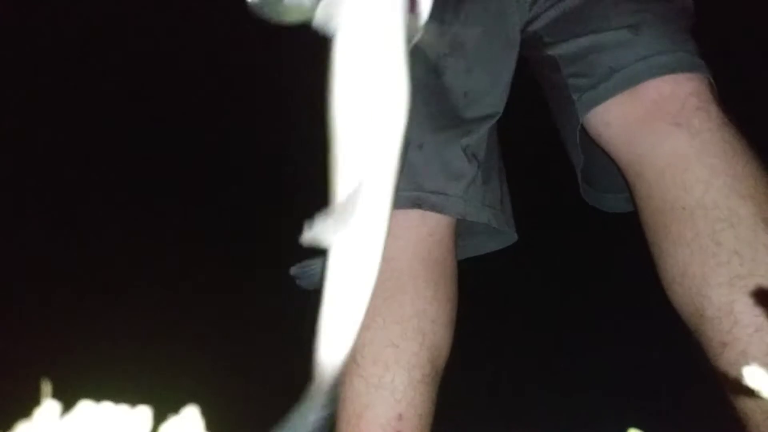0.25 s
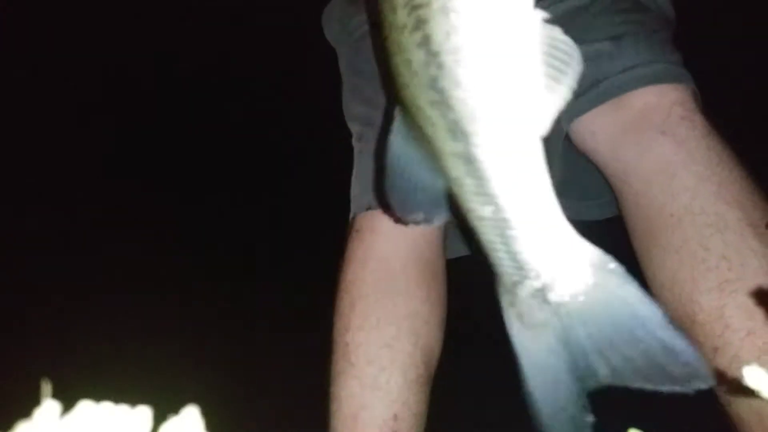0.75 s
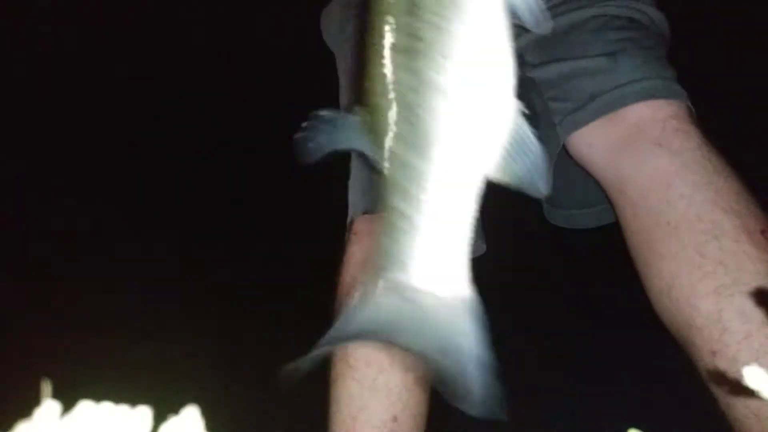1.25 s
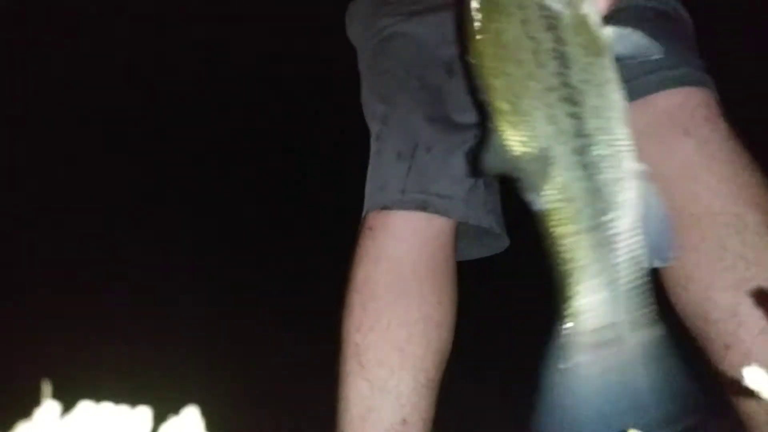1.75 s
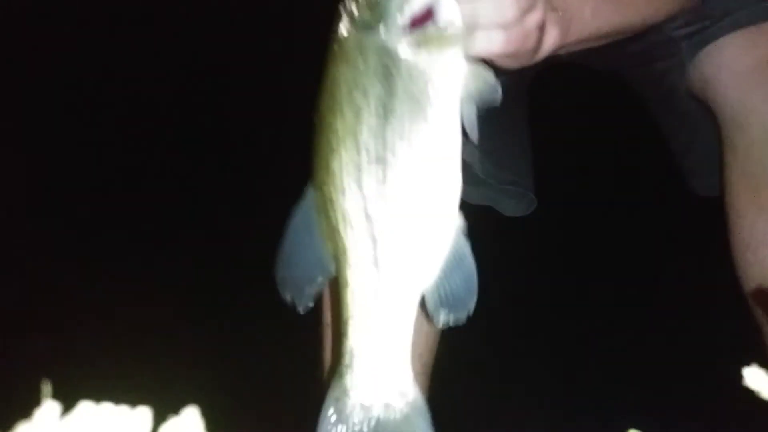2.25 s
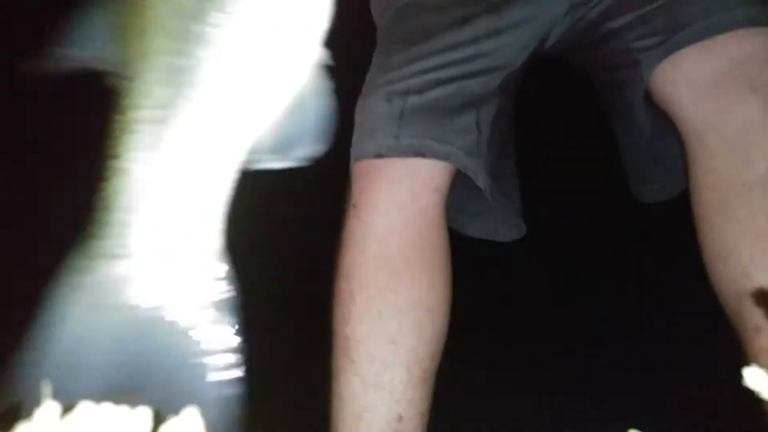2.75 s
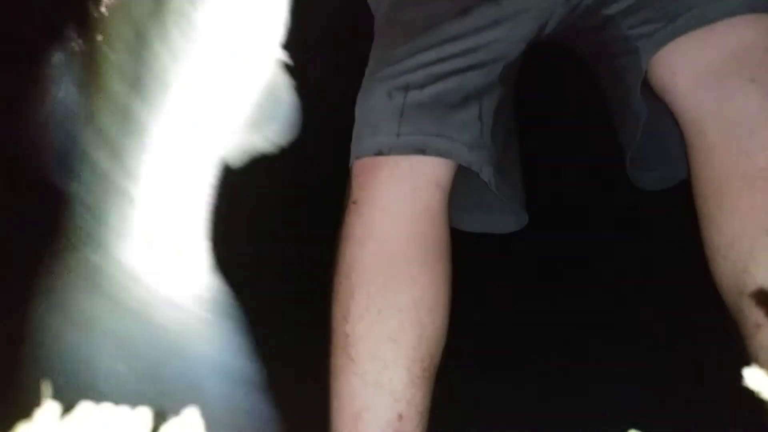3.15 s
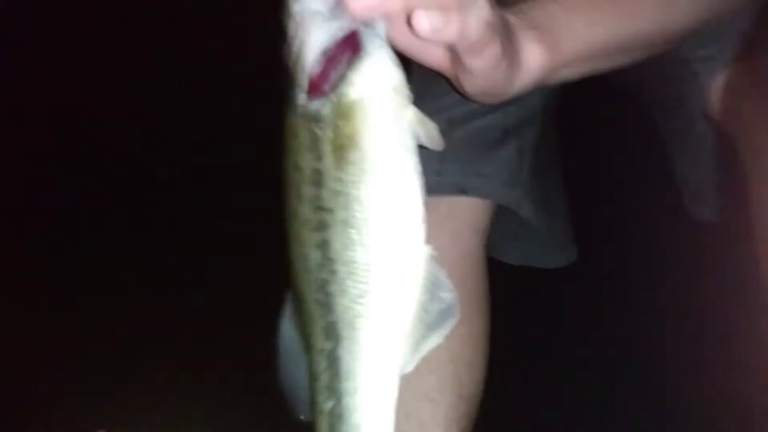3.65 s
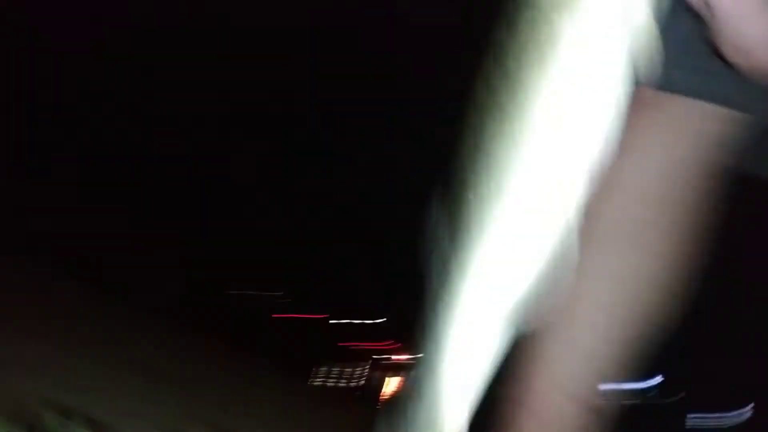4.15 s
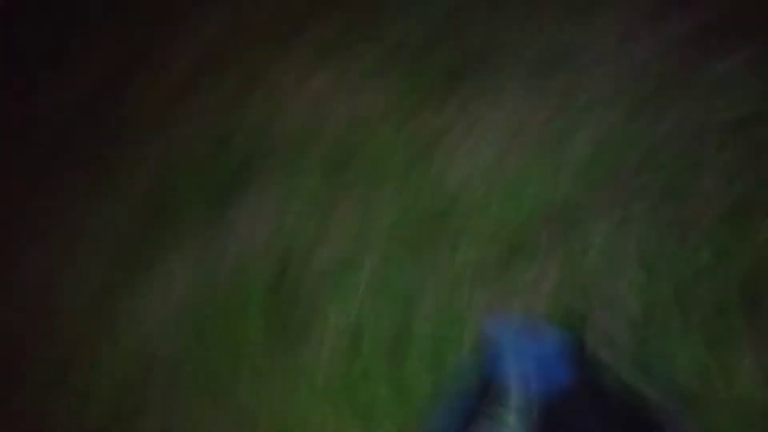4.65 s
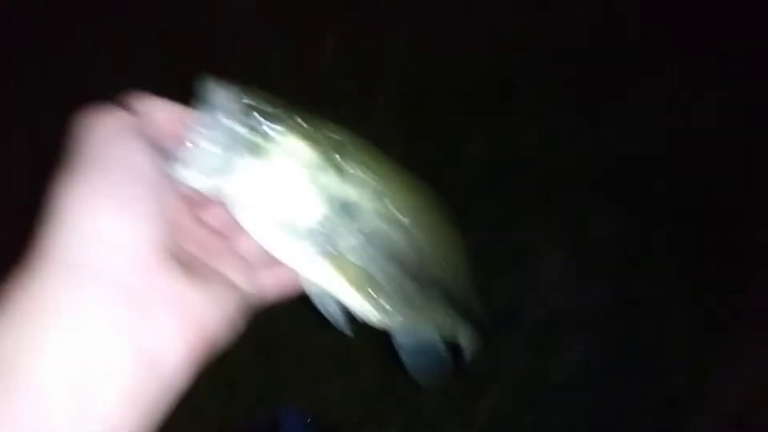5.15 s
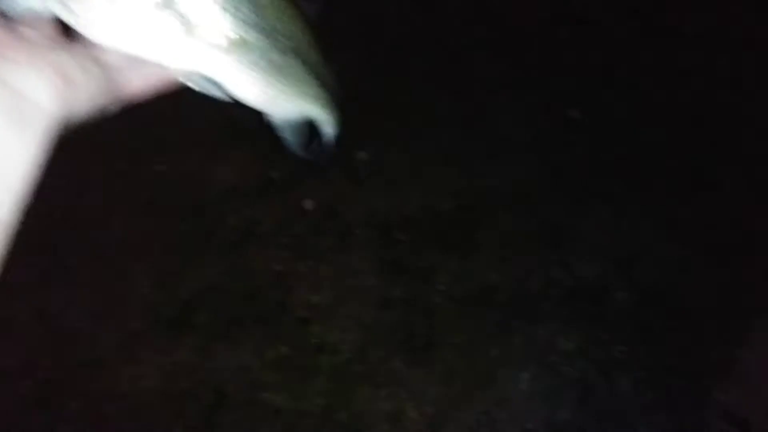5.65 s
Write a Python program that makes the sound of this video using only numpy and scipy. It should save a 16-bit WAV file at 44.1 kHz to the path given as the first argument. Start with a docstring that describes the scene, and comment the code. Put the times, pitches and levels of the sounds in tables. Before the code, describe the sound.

Outdoors on a summer night, two katydids alternate harsh two-stroke rasps above a steady fluttering cricket chorus and faint distant hum. Close to the microphone, a held fish gives a sharp wet slap and a cluster of taps just after two seconds, followed by scuffing hands and cloth and another knock around four. Then the microphone swings toward the insects, making them louder and brighter, with thin high lisps and a distant low trill.

```python
"""Katydids and a fish on a summer night bank

Two katydids trade two-syllable rasps, scraper over file, above a chorus of crickets made of fluttering narrow bands.
Close by someone holds up a fish: it thrashes with wet slaps, short ringing bursts, and hands and clothes rustle in
grains. Late on the microphone swings round to face the chorus, thin high lisps and a distant trill.
Far traffic and machinery lie underneath as coloured noise and a wavering hum."""
import sys
import numpy as np
from scipy import signal
from scipy.fft import rfft, irfft
from scipy.io import wavfile
from scipy.ndimage import uniform_filter1d

SR = 44100
rng = np.random.default_rng(int(sys.argv[2]) if len(sys.argv) > 2 else 0)


def materialize(psi):
    """Save the field psi as 16-bit PCM at rate SR to the path in sys.argv[1].

    A 1-D psi becomes a single channel; in a 2-D psi each row is a channel.
    """
    bounded = np.clip(np.atleast_2d(psi).T, -1, 1)
    quanta = np.round(bounded * 32767).astype(np.int16)
    wavfile.write(sys.argv[1], SR, quanta)


N = 259749
TIME = np.arange(N) / SR  # s
HZ = np.fft.rfftfreq(N, 1 / SR)

# The ring shared by slaps, taps and sticky snaps. Each row: frequency in Hz, relative level in dB.
KNOCK_SPECTRUM = [(100, -46), (500, -31.5), (930, -8.5), (1200, -15), (1600, -6.5), (2050, -8.5),
                  (2400, -7.5), (2650, -7.5), (2950, 0), (3550, -13.5), (4400, -3.5), (5300, -11),
                  (7100, -10.5), (8600, -16.5), (9900, -17.5), (10500, -20.5), (11200, -15), (12200, -31),
                  (13000, -15.5), (14200, -27), (16500, -41)]


def amp(db):
    """Decibels to gain."""
    return 10 ** (np.asarray(db) / 20)


def unit(x):
    """Scales to rms 1."""
    return x / np.sqrt(np.mean(x ** 2) + 1e-20)


def read(points, hz):
    """Reads a spectrum's value, joined on a log-frequency axis."""
    f, value = np.transpose(points)
    return np.interp(np.log(hz + 1), np.log(f + 1), value)


def add(mix, s, sound):
    """Mixes a sound in, starting at time s; whatever falls outside the mix is cut."""
    start = round(s * SR)
    sound = sound[max(-start, 0):]
    part = mix[max(start, 0):][:len(sound)]
    part += sound[:len(part)]


def shaped(x, db):
    """Colours a whole-length signal by a gain in dB at each of HZ."""
    return irfft(rfft(x) * amp(db), N)


def ring(points, tilt_db=0, peak_hz=4000, peak_db=0, octaves=0.27, size=2048):
    """Impulse response of a body with this spectrum, tilted per octave about peak_hz, that resonance brought out."""
    hz = np.fft.rfftfreq(size, 1 / SR)
    apart = np.log2(np.maximum(hz, 300) / peak_hz)  # octaves from the resonance
    db = read(points, hz) + tilt_db * apart + peak_db * np.exp(-(apart / octaves) ** 2)
    log_gain = np.log(amp(np.concatenate([db, db[-2:0:-1]])))
    # minimum phase: the body sounds only after it is struck
    spectrum = np.exp(np.conj(signal.hilbert(log_gain)))
    response = np.fft.ifft(spectrum).real[:size // 2]
    return response / np.linalg.norm(response)


def drift(rate_hz):
    """Slow random wander of rms 1: noise through a soft low-pass."""
    lowpass = np.exp(-(HZ / rate_hz) ** 2) * (HZ > 0)
    return unit(irfft(rfft(rng.standard_normal(N)) * lowpass, N))


def voices(hz, width_hz):
    """Many far singers near one pitch merge into a fluttering narrow band of rms 1."""
    phase = 2 * np.pi * np.cumsum(hz * np.ones(N)) / SR
    return unit(drift(width_hz * 0.71) * np.cos(phase) + drift(width_hz * 0.41) * np.sin(phase))


def swell(s, rise_s, fall_s, shape=2):
    """A rise to 1 at time s and a fall back; shape 1 is pointed, 2 is rounded."""
    return np.exp(-(abs(TIME - s) / np.where(TIME < s, rise_s, fall_s)) ** shape)


def trees(x, wet_db, t60):
    """Ground and foliage scatter sound into sparse random echoes that fade 60 dB in t60 seconds."""
    t = np.arange(SR // 2) / SR
    sparse = rng.standard_normal(len(t)) * (rng.random(len(t)) < .1)
    tail = sparse * (t > .003) * amp(-60 * t / t60)  # first echo after 3 ms
    wet = signal.fftconvolve(x, tail / np.linalg.norm(tail))[:N]
    return (x + amp(wet_db) * wet) / np.sqrt(1 + amp(wet_db) ** 2)


def air(facing, swell_db=1.0, waver_hz=8):
    """Night air and far traffic as a wash whose colour turns with the microphone, plus a wavering machinery hum."""
    # Colour of the wash. Each row: frequency in Hz, relative level in dB.
    wash_spectrum = [(30, -42), (65, -32), (110, -20), (170, -8), (250, 2), (340, 1), (950, -1),
                     (1600, -11), (2400, -15), (3700, -16), (5800, -13), (6900, -21.5), (10000, -29),
                     (15500, -28)]
    # Change of colour with the microphone swung round. Each row: frequency in Hz, gain in dB.
    turned_colour = [(250, 0), (450, -6.5), (750, -2.5), (1100, 5.5), (1600, 13), (2400, 8.5), (4000, 7),
                     (6000, -3), (12000, -3.5)]
    # Distant machinery. Each row: frequency in Hz, level in dB before the 1 dB lift below.
    hum_tones = [(188.4, -67.5), (226.1, -68), (247.6, -65)]
    ahead = unit(shaped(rng.standard_normal(N), read(wash_spectrum, HZ)))
    turned = shaped(ahead, read(turned_colour, HZ))
    level = amp(-48.13 + swell_db * drift(5.0))
    wash = level * ((1 - facing) * ahead + facing * turned)
    hum = sum(amp(db + 1) * voices(hz, waver_hz) for hz, db in hum_tones)
    return wash + hum


def crickets(facing, swell_db=-0.3):
    """A steady chorus of merged singers in several bands, each changed in level where the microphone faces it."""
    # Each row: centre in Hz, width in Hz, level in dB, gain in dB when the microphone faces the chorus fully.
    bands = [(3120, 335, -56, 10), (2960, 660, -60, 13), (4580, 700, -65.5, 14), (6000, 330, -64.5, 5),
             (8200, 380, -75, -12)]
    chorus = np.zeros(N)
    for hz, width_hz, db, gain_db in bands:
        level = amp(db + gain_db * facing + swell_db * drift(15))
        chorus += level * voices(hz, width_hz)
    return chorus


def paired(calls, accent_db, gap_s=.127):
    """Makes each call two wing strokes, the second gap_s later and accented: rows of time, level, tilt."""
    return [(s + k * gap_s, db + k * accent_db, tilt_db) for s, db, tilt_db in calls for k in range(2)]


def katydid(strokes, wing, teeth_hz, jitter, grit, rise, fall, speed_up=1.35, catch_s=0.0011, count=64):
    """Each stroke drags a scraper over a file, ever faster, harder and then softer; every tooth rings the wing."""
    out = np.zeros(N)
    rate = teeth_hz * speed_up ** np.linspace(-1, 1, count)  # teeth per second
    for s, db, tilt_db in strokes:
        spacing = np.maximum(1 + jitter * rng.standard_normal(count), .2) / rate
        at = np.cumsum(spacing)
        peak_s = at[count // 2]
        from_peak = at - peak_s
        teeth = np.zeros(SR // 2)
        teeth[(at * SR).astype(int)] = np.exp(-(from_peak / np.where(from_peak < 0, rise, fall)) ** 2)
        # each click trails a tiny gritty scrape
        trail = signal.lfilter([1], [1, -np.exp(-1 / (catch_s * SR))], teeth + 1e-18)
        scrapes = trail * rng.standard_normal(len(teeth))
        rasp = signal.fftconvolve(unit(teeth) + grit * unit(scrapes), ring(wing, tilt_db))
        # sets the level at the stroke's peak, whatever the tooth rate
        loudness = amp(db) * np.sqrt(SR / teeth_hz) * np.linalg.norm(teeth)
        add(out, s - peak_s, loudness * rasp / np.linalg.norm(rasp))
    return out


def near_katydid():
    """The nearer singer: fairly even teeth, a wing ringing mostly around 4.6 kHz, a short scatter."""
    # Each row: peak of the first stroke in seconds, level in dB, tilt in dB per octave.
    calls = [(.041, -39.5, -0.5), (.717, -39.5, -2.5), (1.49, -39.5, -2.5), (2.174, -42, -3.5),
             (2.952, -39.5, -2), (3.65, -40, -2), (4.161, -41.5, -1.5), (4.814, -44.5, -4),
             (5.621, -47, -5.5)]
    # How its wings ring. Each row: frequency in Hz, relative level in dB.
    wing = [(200, -57), (2700, -16), (3500, -28), (3900, -8.5), (4330, -3), (4600, 1.5), (4880, -5),
            (5600, -15.5), (6600, -29), (9600, -31), (11600, -27), (11950, -16.5), (12500, -28),
            (15700, -21)]
    strokes = paired(calls, accent_db=-0.2)
    rasps = katydid(strokes, wing, teeth_hz=330.4, jitter=.08, grit=0.53, rise=0.046, fall=0.034)
    return trees(rasps, wet_db=-5, t60=.16)


def far_katydid():
    """The farther singer: looser teeth, a wing with strong low and high rings, a long and loud scatter."""
    # Each row: peak of the first stroke in seconds, level in dB, tilt in dB per octave.
    calls = [(.312, -41.5, 2.5), (1.095, -42, 3), (1.757, -42.5, 3.5), (2.565, -42.5, 2), (3.222, -41.5, 1),
             (3.902, -42, 3.5), (4.545, -40, -10.5), (5.21, -44.5, 0), (5.88, -41.5, 0)]
    # How its wings ring. Each row: frequency in Hz, relative level in dB.
    wing = [(200, -91), (1930, -9), (2110, 5.5), (2290, -13), (2600, -1), (3000, -0.5), (3500, -10),
            (4600, 0), (5050, 2), (5700, -7), (6700, -24.5), (10000, -34), (13000, -27.5), (15500, -21.5)]
    strokes = paired(calls, accent_db=0.6)
    rasps = katydid(strokes, wing, teeth_hz=340.5, jitter=.15, grit=0.58, rise=0.045, fall=0.025)
    return trees(rasps, wet_db=-0.5, t60=0.4)


def rubbing(grains_per_s=3500, spread_db=1.5, clump_db=2, snaps_per_s=70, snap_db=-8):
    """Skin and cloth catch and slip in tiny clumped grains: a dull scuff, crackle and a few sticky snaps on top."""
    # One row a stroke: hardest moment in seconds, fade in seconds, relative scuff level in dB, crackle level in dB.
    rubs = [(.5, 0.011, -55, -41.5), (2.211, 0.016, -39.5, -53), (2.36, 0.068, -45, -37),
            (2.428, 0.011, -46, -37.5), (2.52, 0.05, -54, -48.5), (3.323, 0.016, -42, -38),
            (3.42, 0.046, -41, -38), (3.497, 0.034, -43, -44), (3.631, 0.13, -51.5, -48),
            (3.81, 0.033, -38.5, -33.5), (3.9, 0.12, -47.5, -42), (3.995, 0.051, -41, -47),
            (4.09, 0.044, -42.5, -49), (4.228, 0.013, -41, -45.5), (4.41, 0.044, -67, -53),
            (4.62, 0.23, -70, -50.5), (4.825, 0.036, -45, -51)]
    # Colour of the dull scuff. Each row: frequency in Hz, relative level in dB.
    scuff_spectrum = [(50, -48), (150, -33), (450, 6.5), (750, 7), (1050, 12), (1700, 7.5), (2300, -3),
                      (2700, 7.5), (4500, 0), (9000, -67)]
    # Colour of the crackle. Each row: frequency in Hz, relative level in dB.
    crackle_spectrum = [(60, -56), (600, -26), (1800, 1.5), (2800, -0.5), (5300, 3.5), (8000, -3.5),
                        (10000, -11.5), (12500, -16), (15500, -18)]
    _, _, scuff_db, crackle_db = np.transpose(rubs)
    strokes = np.array([swell(s, fade, fade, shape=1.29) for s, fade, _, _ in rubs])
    # overlapping strokes add in power
    scuff_level = amp(2.5) * np.sqrt(amp(scuff_db) ** 2 @ strokes ** 2)
    crackle_level = np.sqrt(amp(crackle_db) ** 2 @ strokes ** 2)
    clumps = amp(clump_db * drift(96))
    size = amp(spread_db * np.minimum(rng.exponential(1, (2, N)), 4))
    happens = rng.random((2, N)) < grains_per_s / SR
    slips = size * rng.choice([-1, 1], (2, N)) * happens * clumps
    scuff = unit(signal.fftconvolve(slips[0], ring(scuff_spectrum))[:N])
    crackle = unit(signal.fftconvolve(slips[1], ring(crackle_spectrum))[:N])
    pulls = size[0] * (rng.random(N) < snaps_per_s / SR)
    snaps = unit(signal.fftconvolve(pulls, ring(KNOCK_SPECTRUM))[:N])
    return scuff_level * scuff + crackle_level * (crackle + amp(snap_db) * snaps)


def knocks(level_db=-6, attack=0.00014, resonance_db=8):
    """Each slap or tap is a burst of a few milliseconds that excites all pitches evenly and rings briefly."""
    # Each row: contact in seconds, level in dB before level_db, decay in seconds, tilt in dB per octave,
    # resonance brought out in Hz.
    blows = [(0.9046, -23, 0.0014, -5.5, 5900), (1.2686, -24, 0.002, -1, 4100),
             (2.0115, -13, 0.0021, 0, 5550), (2.2125, -12, 0.003, -0.5, 5100),
             (2.2221, 0.5, 0.0019, 1.5, 4970), (2.2238, -4, 0.00088, 11.5, 5660),
             (2.252, -11, 0.0028, .5, 5000), (2.2667, -13.5, 0.0037, 2, 6100),
             (2.3076, -15.5, 0.0049, -0.5, 5100), (2.3437, -17, 0.0023, -1, 2900),
             (2.355, -21.5, .005, 2, 3900), (2.361, -25, 0.0021, 2, 11100), (2.4037, -16.5, .0016, 0, 5900),
             (3.874, -18.5, 0.0018, -7.5, 1350), (3.893, -23, .001, 3, 8400),
             (3.991, -25, 0.0013, 1.5, 2500), (4, -20, .001, -5, 5500), (4.0805, -0.5, 0.00066, -3, 3740),
             (4.669, -29, .0027, -1, 2830)]
    lead = .01  # s ahead of the contact, room for what the evening-out smears
    out = np.zeros(N)
    t = np.maximum(np.arange(4096) / SR - lead, 0)
    for s, db, decay, tilt_db, hz in blows:
        force = (1 - np.exp(-t / attack)) * np.exp(-t / decay)
        splatter = rfft(force * rng.standard_normal(len(t)))
        # evens out the spectrum so that no pitch stands out by chance
        local_power = uniform_filter1d(abs(splatter) ** 2, size=25)
        burst = irfft(splatter / np.sqrt(local_power + 1e-12))
        blow = signal.fftconvolve(burst, ring(KNOCK_SPECTRUM, tilt_db, hz, resonance_db))
        add(out, s - lead, amp(db + level_db) * blow * np.linalg.norm(force) / np.linalg.norm(blow))
    return out


def lisps(hz=7450, width_hz=220, length=0.022, gap_s=.139):
    """A small insect's evenly spaced soft swells of a nearly pure high note."""
    # Each row: first lisp in seconds, last lisp in seconds, level in dB.
    runs = [(4.386, 5.085, -61.5), (5.503, 5.781, -69)]
    level = np.zeros(N)
    for first, last, db in runs:
        for s in np.arange(first, last + gap_s / 2, gap_s):
            level += amp(db) * swell(s, length, length)
    return level * voices(hz, width_hz)


def swept(x, s=4.667, length=.026, gain_db=7.5):
    """The microphone swings past a singer: for a moment it is louder and fuller."""
    # What the sweep picks up. Each row: frequency in Hz, gain in dB before gain_db.
    colour = [(1500, -19), (2100, -4.5), (2700, -4), (3400, 8), (5000, -3), (8000, -1), (15000, -16)]
    return x + amp(gain_db) * swell(s, length, length) * shaped(x, read(colour, HZ))


def trill(width_hz=210, sag_hz_per_s=240):
    """Two far calls, perhaps a frog's: fluttering bands that swell, fade and sag in pitch."""
    # Each row: loudest moment in seconds, half length in seconds, level in dB, pitch at the loudest in Hz.
    calls = [(5.022, 0.26, -46, 1820), (5.635, 0.16, -42.5, 1745)]
    out = np.zeros(N)
    for s, length, db, hz in calls:
        pitch = hz - sag_hz_per_s * (TIME - s)
        out += amp(db) * swell(s, length, length) * voices(pitch, width_hz)
    return out


def scene():
    """Insects in the trees, handling close by; both channels hear the same."""
    # How far the microphone faces the chorus. Each row: time in seconds, share from 0 to 1.
    turning = [(0, 0.09), (2.8, 0.14), (3.6, 0.03), (4.1, .3), (4.42, 0.4), (4.6, 0.62), (5, 0.92),
               (5.45, 0.74), (5.9, 0.83)]
    facing = np.clip(np.interp(TIME, *np.transpose(turning)), 0, 1)
    insects = crickets(facing) + near_katydid() + swept(far_katydid()) + lisps()
    handling = rubbing() + trees(knocks(), wet_db=-18.5, t60=0.072)
    mono = air(facing) + insects + handling + trill()
    return np.array([mono, mono])


def record(dry):
    """The recorder's band limit: a steep low-pass at 15.8 kHz."""
    lowpass = signal.firwin(511, 15800, window=("kaiser", 9), fs=SR)
    return signal.oaconvolve(dry, lowpass[None], "same")


dry = scene()
out = record(dry)
materialize(out)
```